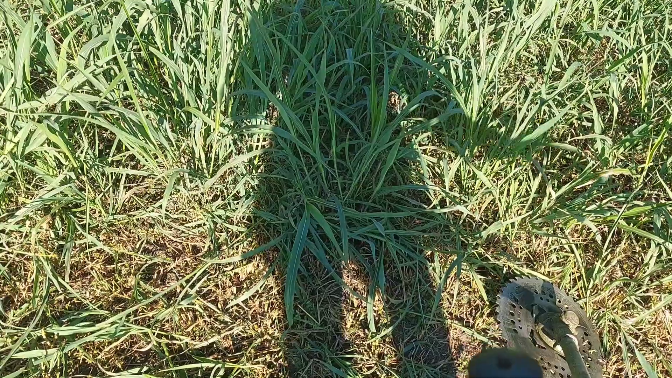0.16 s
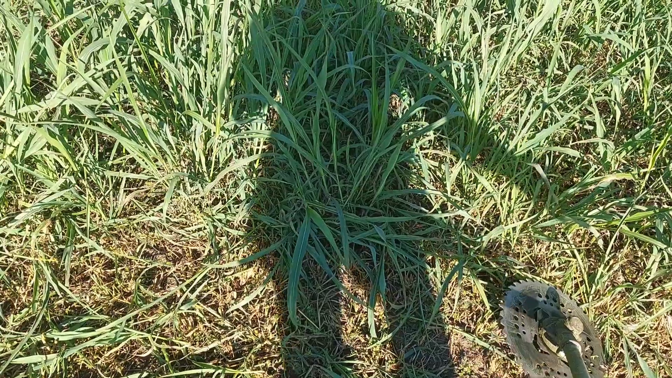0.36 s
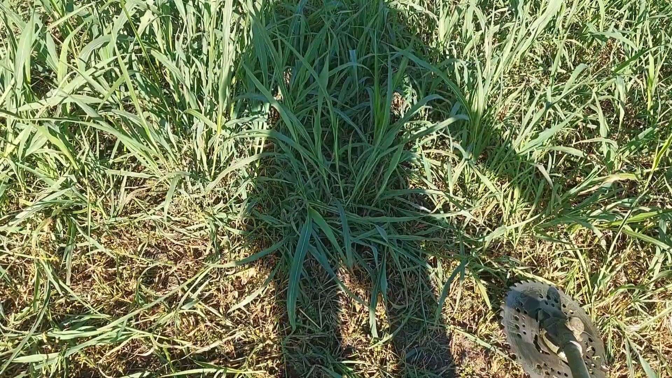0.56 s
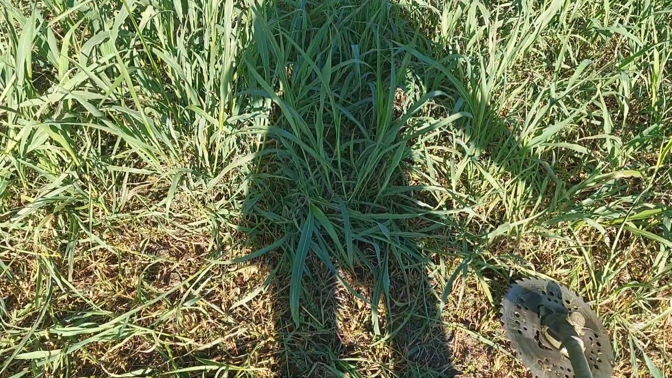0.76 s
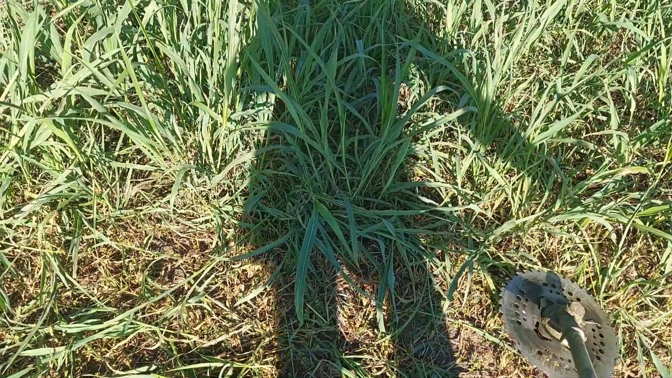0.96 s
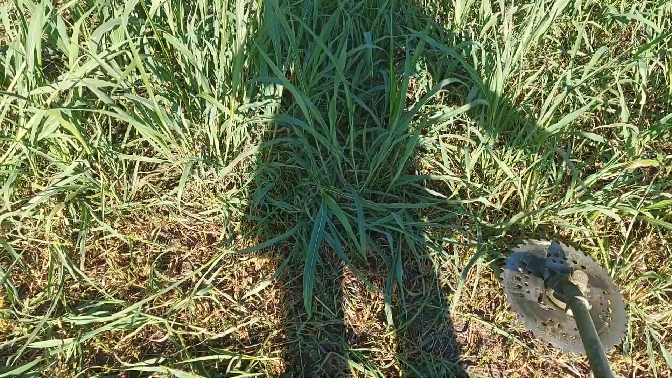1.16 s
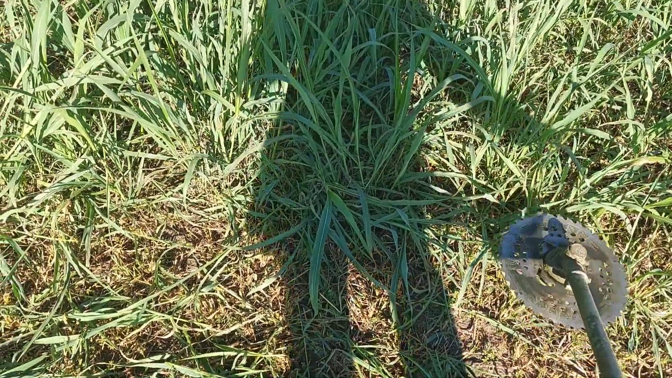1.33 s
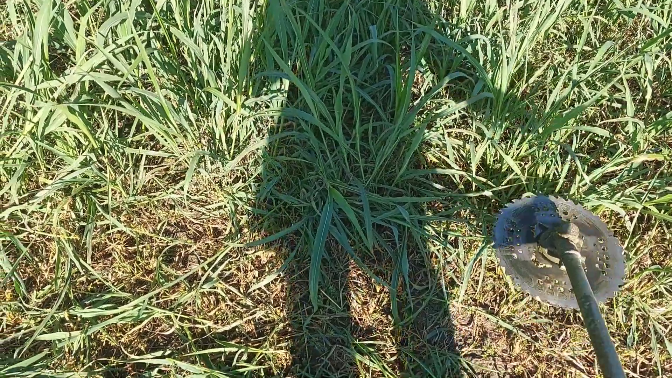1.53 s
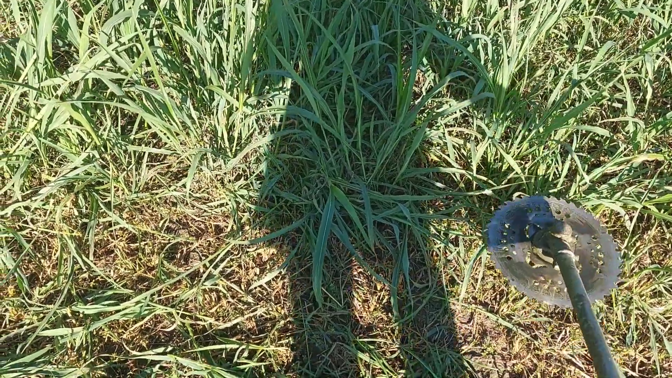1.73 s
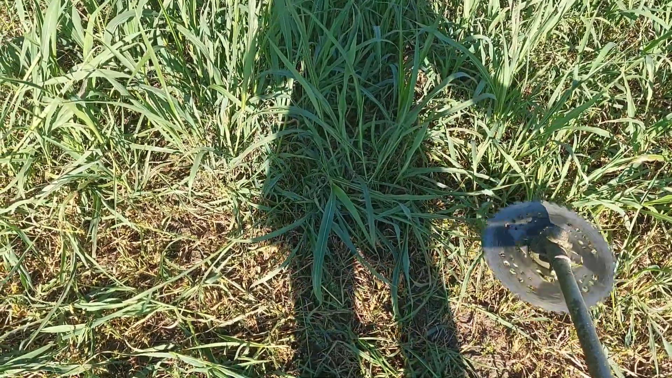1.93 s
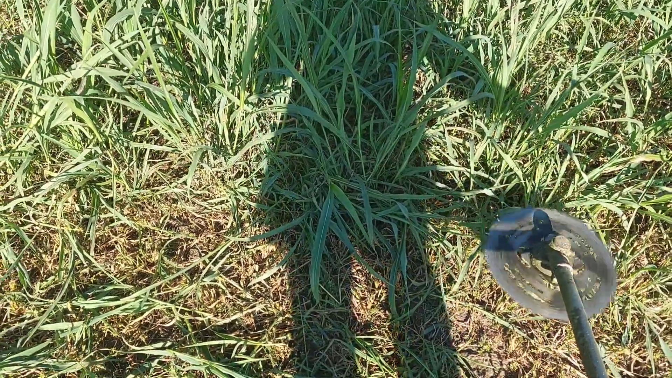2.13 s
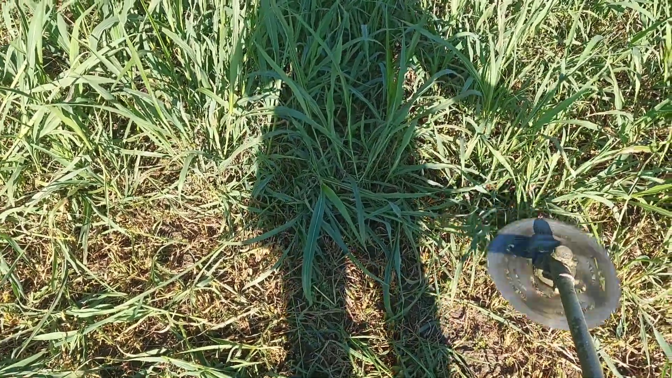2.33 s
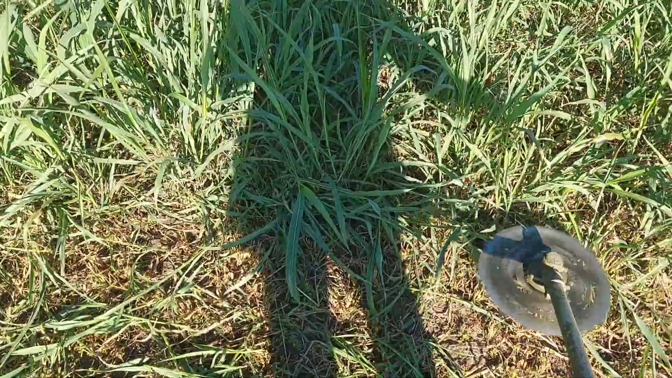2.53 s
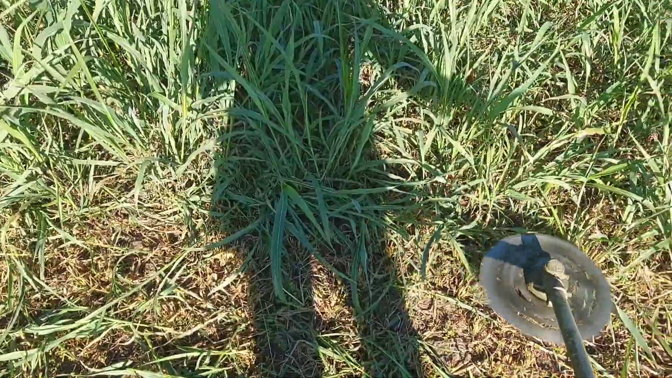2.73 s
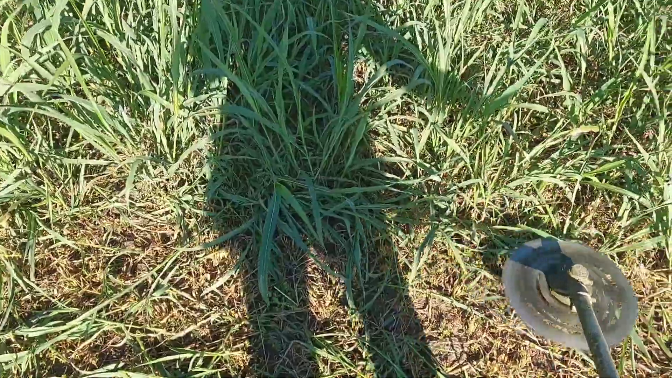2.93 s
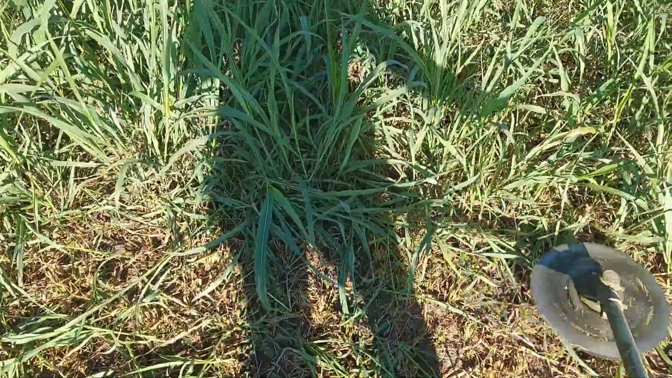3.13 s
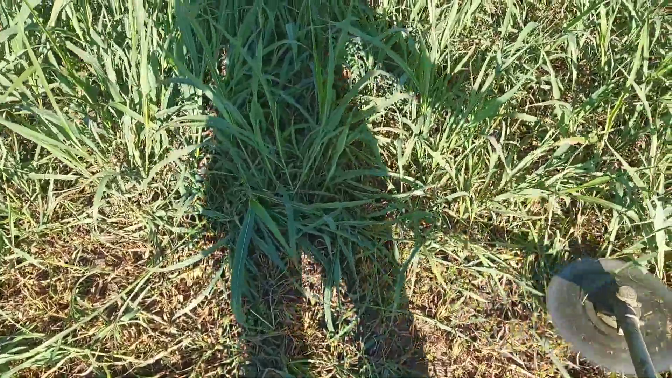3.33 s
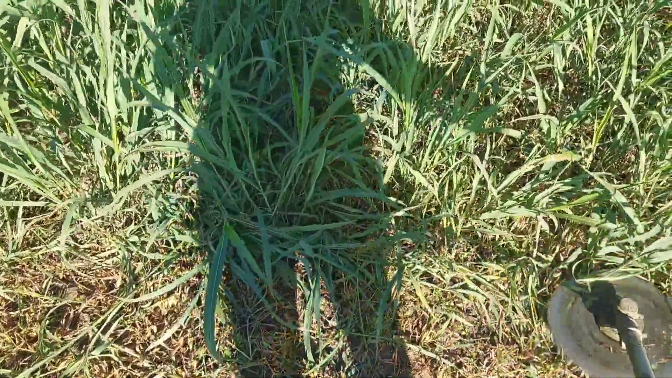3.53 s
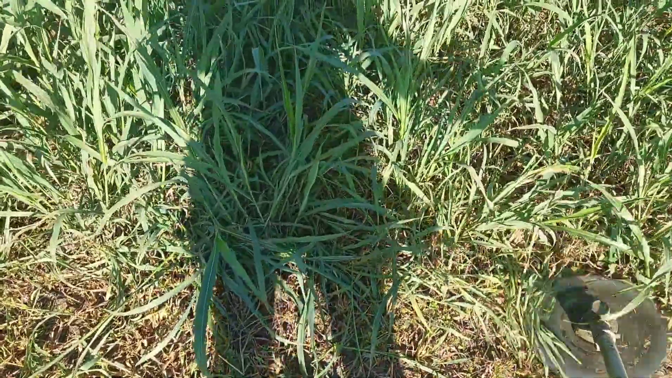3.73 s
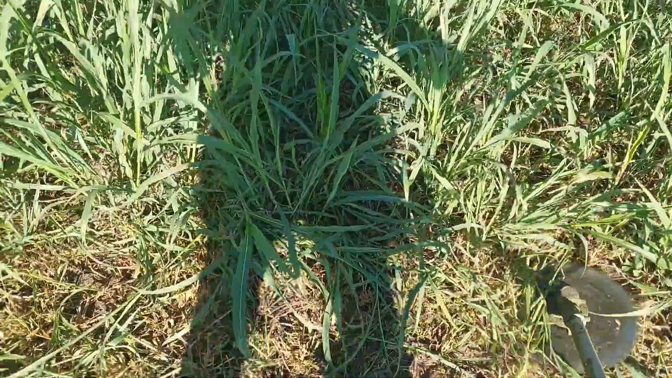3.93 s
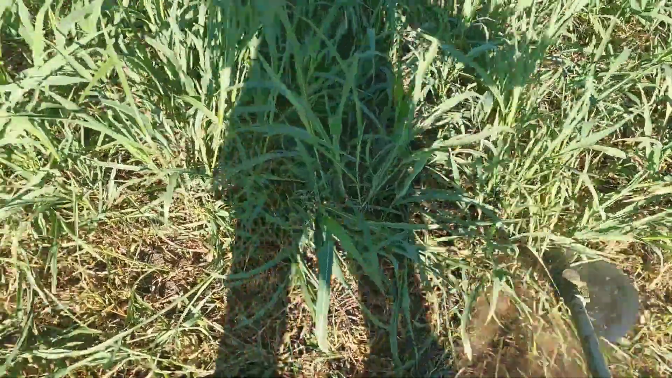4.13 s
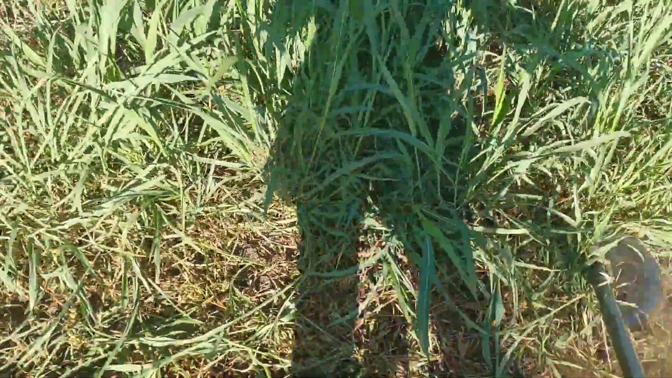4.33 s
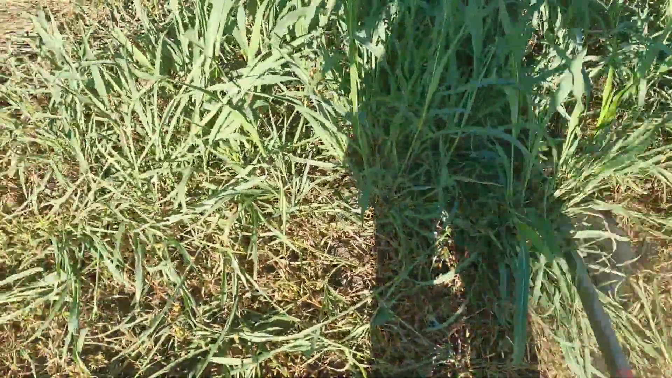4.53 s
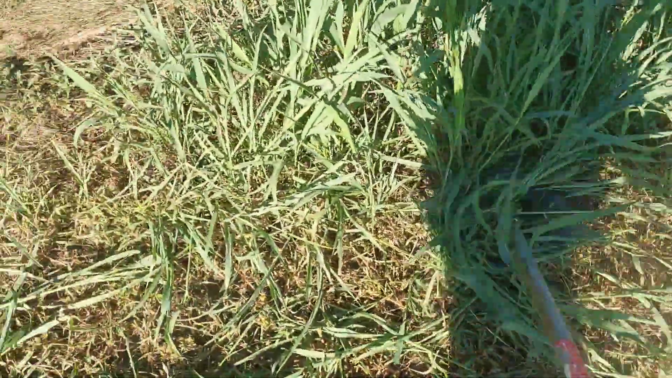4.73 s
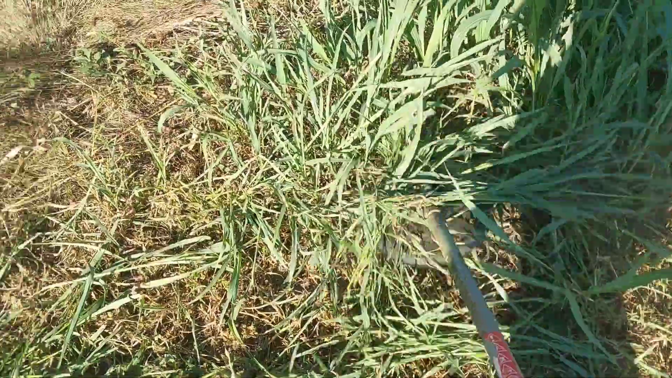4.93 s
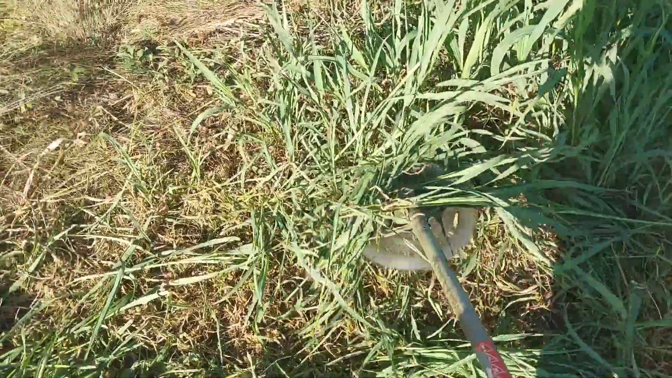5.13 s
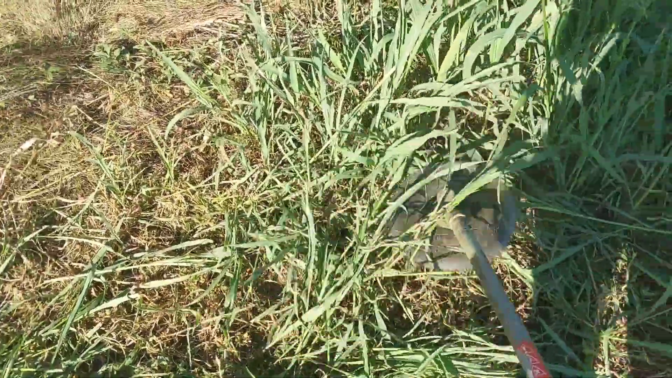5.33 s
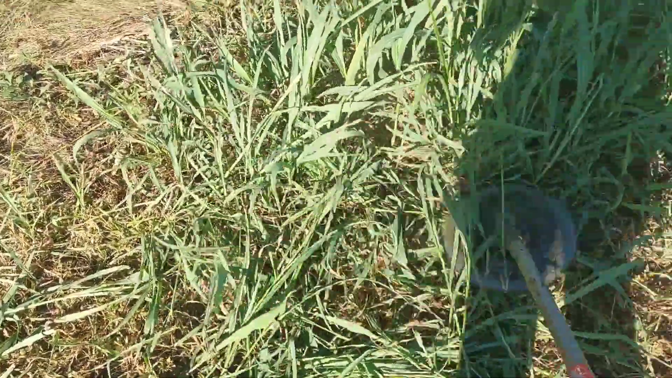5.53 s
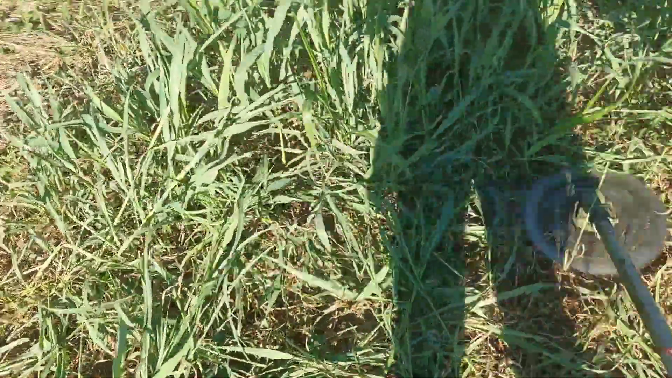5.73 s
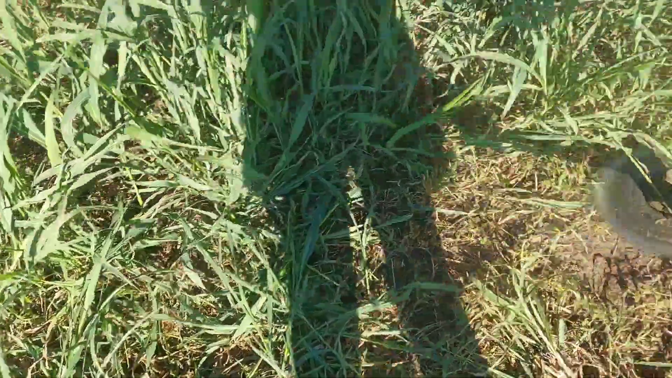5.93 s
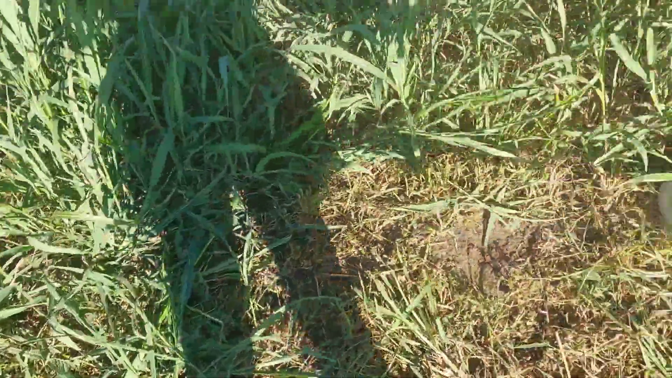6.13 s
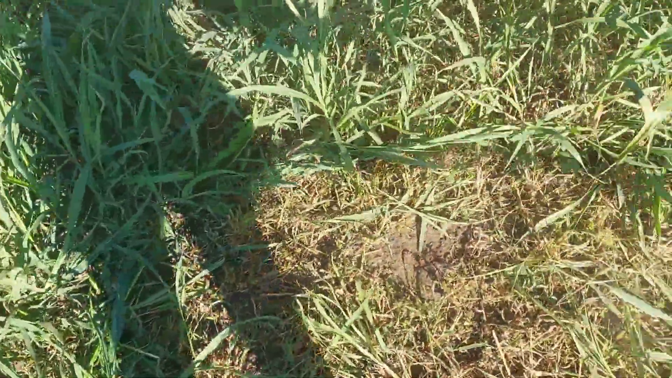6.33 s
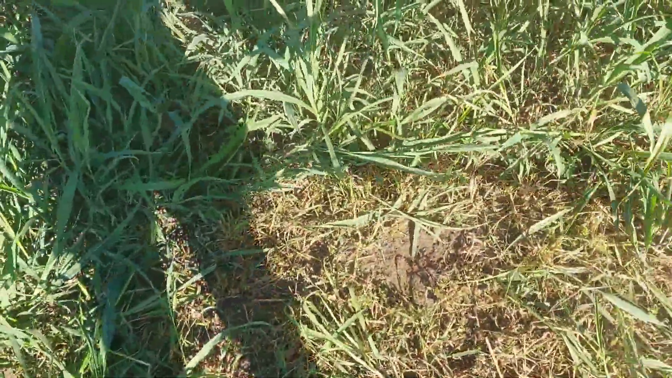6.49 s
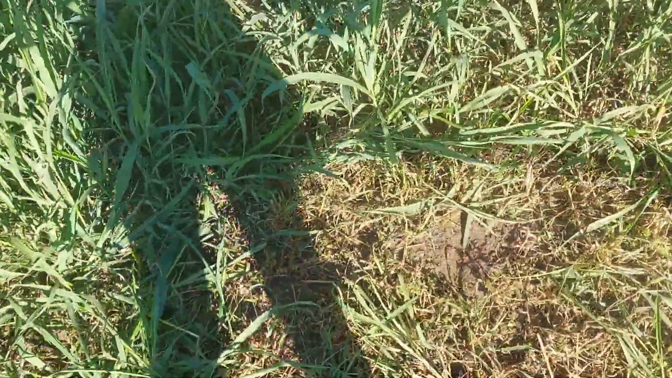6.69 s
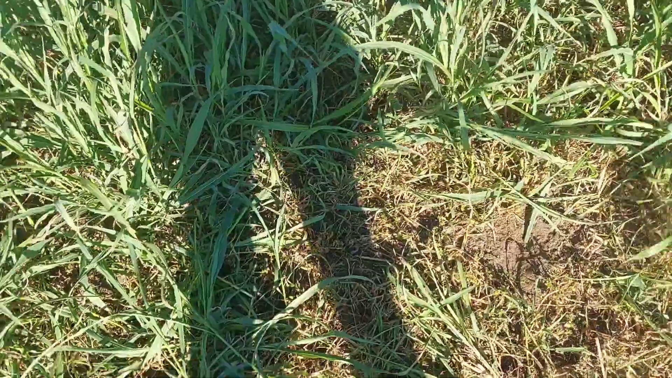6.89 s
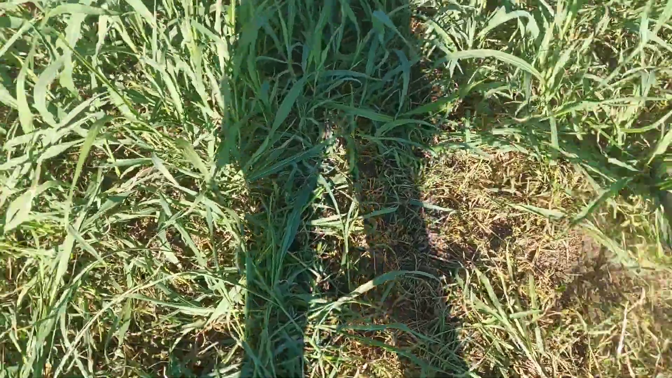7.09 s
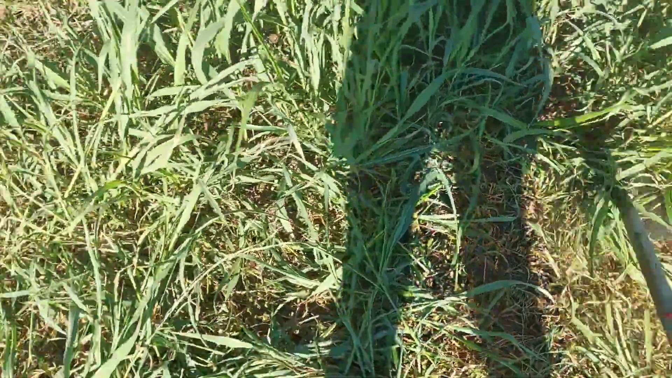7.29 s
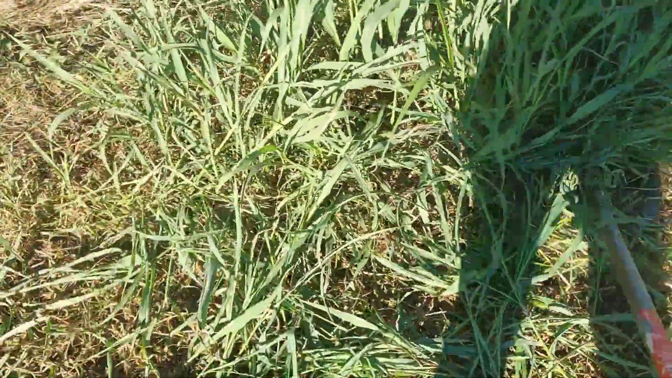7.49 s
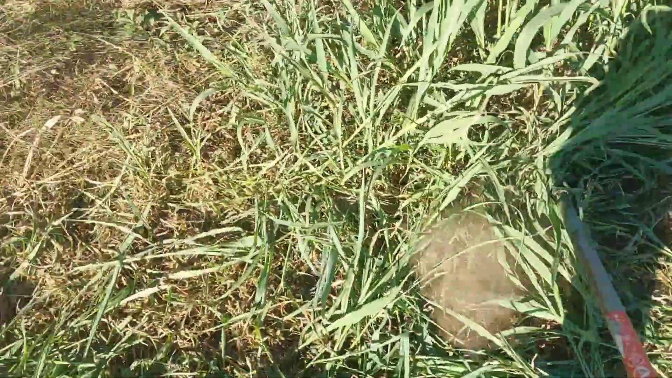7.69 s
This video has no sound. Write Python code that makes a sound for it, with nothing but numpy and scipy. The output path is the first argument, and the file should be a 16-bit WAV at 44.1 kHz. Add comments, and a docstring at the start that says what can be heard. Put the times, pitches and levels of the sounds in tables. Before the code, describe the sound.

Outdoors in tall grass, close to the microphone, leaves brush quietly and squeak on steel, and dry stems tick. Just before two seconds a trimmer drive grinds and spins up, gear whine and tooth whistle gliding upward together. From past three seconds, bright hissing bursts and sharp snaps of stalks ride on the steady whirr, with low thumps of air on the microphone.

```python
"""In tall grass, close to the microphone, a brush cutter with a toothed steel disc is lifted, spins up and mows.
Stems tick and leaves rustle as shaped noise bursts; then gear and shaft tones glide with one disc speed.
The teeth whistle and hiss through the air as tones and noise bands tied to that speed.
Stalks add short bursts of noise and tooth strikes; puffs of low-passed noise thump on the microphone."""
import sys
import numpy as np
from scipy import signal
from scipy.fft import rfft, irfft, next_fast_len
from scipy.io import wavfile
from scipy.ndimage import uniform_filter1d, map_coordinates

SR = 44100
rng = np.random.default_rng(int(sys.argv[2]) if len(sys.argv) > 2 else 0)


def store_wav(level_fs):
    """Save 16-bit WAV to argv[1]."""
    pcm = np.round(np.clip(np.atleast_2d(level_fs), -1, 1) * 32767)
    wavfile.write(sys.argv[1], SR, pcm.T.astype(np.int16))


N = 341775
T = np.arange(N) / SR  # time [s]

# All levels in the tables are relative to the gain of their own layer.
# Rotation of the disc: (time [s], speed [turns/s])
DISC_SPEED = [(1.7, 1), (2.5, 34.5), (2.8, 52), (3.1, 67.2), (3.4, 78.5), (3.7, 86.1), (4.02, 90.6),
              (4.1, 85.7), (4.5, 90.8), (5, 96), (5.4, 99.3), (6.15, 98.2), (6.45, 99.5), (6.54, 97.1),
              (6.75, 99), (7.5, 97.9), (7.62, 95.4), (7.75, 96.8)]
# Slow swells of the machine noises: (time [s], hiss level [dB], rattle level [dB], rumble level [dB])
NOISE_SWELLS = [(2.2, -2.5, -1.5, -5.5), (2.55, 3, 1.5, -2), (3.05, 1.5, 1.5, 2), (3.62, 1, 2, 1.5),
                (3.72, -1.5, 2, -1.5), (4.3, -2.5, 0, -1.5), (4.8, -1.5, 1, -2.5), (5.5, 2, 3, 0),
                (5.7, -2, 0.5, -1.5), (6.25, 0, -2.5, 0.5), (6.5, 0.5, -0.5, 1.5), (6.8, -3, -2.5, -0.5),
                (7.35, -2, -2, -.5), (7.58, 0, -3, -0.5), (7.75, -4, 0.5, -4.5)]

# Puffs on the microphone: (start [s], length [s], level [dB], cutoff [Hz])
AIR_PUFFS = [(0.145, 0.071, -61, 128), (0.518, 0.05, -57, 181), (3.666, 0.059, -32, 100),
             (4.01, 0.16, -33, 130), (4.478, 0.049, -36, 91), (6.146, 0.048, -36.5, 130),
             (6.456, 0.059, -35, 89.5), (6.7, 0.11, -31.5, 100), (6.83, 0.049, -29.5, 100),
             (7.049, 0.056, -31, 98), (7.423, 0.058, -29, 100), (7.495, 0.048, -19.5, 187),
             (7.656, 0.12, -31.5, 200)]
# Leaves brushing the cutting head: (start [s], length [s], level [dB])
LEAF_BRUSHES = [(.28, .13, -83), (0.593, .36, -79), (0.952, 0.2, -70), (1.16, 0.21, -72),
                (1.375, 0.28, -63.5), (1.575, 0.18, -67.5), (1.726, 0.2, -60.5)]
# Leaves squeaking along the steel: (start [s], length [s], centre [Hz], approximate width [Hz], level [dB])
LEAF_SQUEAKS = [(0.536, 0.046, 4200, 3000, -64), (0.676, 0.14, 3620, 1405, -64.5),
                (0.795, 0.18, 4520, 170, -67), (0.995, 0.081, 3510, 2010, -58),
                (0.98, 0.16, 3270, 352, -66), (1.805, 0.072, 4130, 400, -48)]
# Stems flicking the disc: (time [s], level [dB], left-right difference [dB])
STEM_TICKS = [(0.305, -52, 0), (0.5511, -43, 16), (1.014, -43, 2.5), (1.253, -35.5, 7), (1.6708, -30, -1),
              (1.688, -20, 4.5), (1.71, -32, 3.5), (1.8347, -23, 4), (1.8733, -23, 9), (1.9031, -8.5, 1),
              (1.9829, -17.5, 2), (2.0226, -36, 11.5)]

# Growls of the shaft tube: (start [s], length [s], centre [Hz], approximate width [Hz], level [dB])
TUBE_GROWLS = [(1.732, 0.029, 450, 498, -50), (1.715, 0.18, 1900, 4400, -48.5),
               (1.88, 0.048, 440, 350, -32), (2.09, 0.074, 500, 351, -29.5), (2.245, 0.1, 570, 552, -29)]
# Orders of the turning parts: (multiple of the disc rate [1], level [dB])
SHAFT_ORDERS = [(1, -42), (2, -57.5), (3.48, -48), (3.85, -59.5), (5, -47), (17.3, -46)]
# Housing resonances crossed by the shaft orders: (centre [Hz], width [Hz], boost [dB])
HOUSING_MODES = [(272, 97, 13.5), (1146, 210, 21)]
# Noisy overtones of the slack gears: (multiple of the disc rate [1], level [dB])
GEAR_OVERTONES = [(34.6, -8.5), (56, -12.5), (61, -9), (80.5, -18)]
# Gear-case resonances crossed by the whine: (centre [Hz], width [Hz], boost [dB])
CASE_MODES = [(765, 65, 16), (1157, 120, 13), (1866, 560, 14)]
# Flares of the whine as the drive pulls harder: (start [s], length [s], boost [dB])
WHINE_FLARES = [(3.3, 0.8, 4), (5.59, 0.35, 13), (7.476, 0.38, 10)]
# Tooth whistle by pitch: (tooth rate [Hz], level [dB])
WHISTLE_STRENGTH = [(840, -51), (1400, -32), (1780, -32.5), (2400, -33.5), (2950, -26.5), (3150, -33),
                    (3300, -43), (3620, -34), (3950, -25)]
# Gliding bands of eddies: (multiple of the disc rate [1], width [multiples of the disc rate], level [dB])
EDDY_BANDS = [(35.45, 2, -20), (40.03, 9, -18.5), (60.45, 7, -12.5), (69.2, 12, -11.5), (79.6, 8, -8),
              (97.1, 18, -3), (116, 9, -8.5)]

# Tufts bitten by the rim: (start [s], length held [s], level [dB])
GRASS_TUFTS = [(3.372, 0.2, -26), (3.644, 0.019, -22), (3.82, 0.033, -23), (4.019, 0.11, -16),
               (4.48, 0.064, -22), (4.56, 0.14, -31), (5.533, 0.11, -20), (5.64, 0.57, -23),
               (6.073, 0.13, -22), (6.475, 0.156, -28), (6.68, .09, -23), (6.838, 0.18, -22),
               (7.033, 0.34, -24.5), (7.432, 0.18, -19), (7.69, .03, -26)]
# Thick stalks being severed: (time [s], level [dB])
THICK_STALKS = [(3.899, 5), (4.3144, -1), (4.3839, -11), (4.5044, 4), (5.564, 0), (6.4742, 5.5),
                (6.7194, 0), (6.8513, -11), (7.0648, 3.5), (7.131, 3), (7.2044, 4), (7.3148, -16),
                (7.4444, 1), (7.7094, -6)]
# Harmonics of the tooth strikes: (multiple of the tooth rate [1], level [dB])
STRIKE_HARMONICS = [(1, -33), (2, 11), (3, 7.5), (4, 12)]

# Growth of noise with speed: (limiting level [dB], knee [turns/s], power exponent [1])
RUMBLE_GROWTH = (-34, 9.7, 3)
RATTLE_GROWTH = (-27.5, 47.4, 3.15)
AIR_GROWTH = (-23.5, 57.2, 4.86)

# Spectral shapes of wind, leaves, stem cracks, shaft, gears, tooth hiss and shredding:
# (frequency [Hz], level [dB])
WIND_SPECTRUM = [(15, -22), (30, -17), (50, -3.5), (80, 0.5), (140, -6), (250, -10.5), (600, -25),
                 (2000, -68)]
PUFF_SPECTRUM = [(22, -30), (40, 3), (55, -2), (400, 4.5)]
LEAF_SPECTRUM = [(88, -46), (150, -16), (213, -8), (421, -23), (713, -15), (1550, -14.5), (2790, -11.5),
                 (3260, -13), (3740, -9.5), (6700, -7), (9710, -16.5), (15800, -7.5)]
CRACK_SPECTRUM = [(300, -23), (1500, -14), (2600, 2), (3500, -6), (4700, 1), (6500, 3.5), (9000, -12),
                  (13000, -12), (16000, -10)]
RUMBLE_SPECTRUM = [(60, -54), (120, -6), (175, -11.5), (260, 1), (330, 0), (500, 2.5), (620, -5),
                   (800, -6.5), (1200, -25), (3000, -67)]
RATTLE_SPECTRUM = [(300, -27), (650, -1), (800, -2.5), (1000, -2), (1400, -1), (2200, 1.5), (3000, -4),
                   (5000, -9), (9000, -42), (16000, -60)]
HISS_SPECTRUM = [(600, -22.5), (1500, -4), (2300, -2.5), (3000, 2.5), (3700, -1.5), (4600, 3), (5600, 2),
                 (7200, 1), (8500, -6), (10000, -7.5), (13000, -2.5), (16000, -7)]
SHRED_SPECTRUM = [(800, -34), (2000, -7.5), (3200, 4), (5000, 1), (7500, 5.5), (9000, -1.5), (10500, -2),
                  (12000, 7.5), (14000, 3.5), (15700, 12.5), (17000, -40)]

GEAR_TEETH, DISC_TEETH = 20, 40
START_S, IN_GRASS_S = 1.715, 3.3  # the drive engages; the rim reaches the grass
BREEZE_DB, DRAUGHT_DB, GUST_DB = -76, -54, 1  # relative: still air, full-speed draught, its random swing
STIR_DB = -75.5  # relative level of leaves stirring all the while
SETTLE_HZ, SETTLE_DB = 61, 8  # above this speed [turns/s] the gears settle and rattle less
WHINE_DB = -40  # before resonances and flares
COAST_HZ, COAST_DB = 95, 9.5  # above this speed [turns/s] the gears carry less torque and whine less
BITE_S, CLEAR_S = 0.01, 0.043  # linear attack and exponential decay constant of a bite
STRAY_DB = -28  # relative level of stray blades between tufts
HISS_SIDE_DB, TREBLE_SIDE_DB = 4.5, -5.5  # left-right difference of the disc and of the highest cutting treble
LEFT_LAG_S = 0.00014  # the left side hears the machine later
TOP_HZ = 15880  # band limit of the recorder


def amp(db):
    """Logarithmic level: decibels become an amplitude ratio."""
    return 10 ** (np.asarray(db) / 20)


def unit(x):
    """Normalisation by effective value: the signal is scaled to rms 1."""
    return x / np.sqrt(np.mean(x ** 2) + 1e-20)


def curves(rows):
    """Linear interpolation: each column after the time gets one value per sample."""
    s, *columns = np.transpose(rows)
    return [np.interp(T, s, column) for column in columns]


def onset(s):
    """Linear gating: the gain opens over 50 ms from time s."""
    return np.clip((T - s) * 20, 0, 1)


def swell(s, length):
    """Raised-cosine window: a smooth bump starts at s."""
    return np.sin(np.pi * np.clip((T - s) / length, 0, 1)) ** 2


def pan(db):
    """Interaural level difference: half is given to the left and half taken from the right."""
    side = np.atleast_1d(db)
    return amp(np.array([side, -side]) / 2)


def wobble(rate):
    """Slow random modulation: a spline joins Gaussian knots, rate of them a second."""
    knots = rng.standard_normal(int(N * rate / SR) + 4)
    return map_coordinates(knots, [T * rate])


def filtered(x, gain):
    """Linear filtering: the spectrum is multiplied by a frequency-dependent gain."""
    size = next_fast_len(x.shape[-1] + 8192)
    hz = np.fft.rfftfreq(size, 1 / SR)
    return irfft(rfft(x, size) * gain(hz), size)[..., :x.shape[-1]]


def coloured(x, points):
    """Spectral shaping: levels are interpolated on a logarithmic frequency axis, at rms 1."""
    f, db = np.transpose(points)
    return unit(filtered(x, lambda hz: amp(np.interp(np.log(hz + 1), np.log(f), db))))


def noise(points, alike=0):
    """Partial coherence: both sides of a stereo noise have the power share alike in common."""
    common = np.sqrt(alike) * rng.standard_normal(N)
    separate = np.sqrt(1 - alike) * rng.standard_normal((2, N))
    return coloured(common + separate, points)


def tone(cycles, rough, flutter):
    """Line broadening: the rough power share of a tone flutters at random in level and phase."""
    angle = 2 * np.pi * cycles
    steady = np.sqrt(2 * (1 - rough)) * np.cos(angle)
    fluttering = wobble(flutter) * np.cos(angle) + wobble(flutter) * np.sin(angle)
    return steady + np.sqrt(rough) * fluttering


def band(cycles, spread):
    """Narrow-band noise: random quadratures on a gliding line lose coherence with each step of spread."""
    knots = rng.standard_normal((2, 2, int(spread[-1]) + 4))
    steps = np.arange(knots.shape[-1])
    cos, sin = np.cos(2 * np.pi * cycles), np.sin(2 * np.pi * cycles)
    sides = [np.interp(spread, steps, a) * cos + np.interp(spread, steps, b) * sin for a, b in knots]
    return unit(np.array(sides))


def patchy(x, depth_db):
    """Time-varying filtering: the colour shifts in patches as the head moves over the ground."""
    z = signal.stft(x, nperseg=512)[2]
    field = rng.standard_normal(z.shape[1:])
    field = uniform_filter1d(field, size=5, axis=0)  # across frequency
    field = uniform_filter1d(field, size=16, axis=1)  # across time
    gain = unit(amp(depth_db * unit(field)))
    return signal.istft(z * gain, nperseg=512)[1][:, :N]


def resonance_db(hz, modes):
    """Resonance: a moving tone is lifted as it crosses each mode."""
    return sum(db / (1 + ((hz - centre) / (width / 2)) ** 2) for centre, width, db in modes)


def plate_db(hz):
    """Plate resonance: the steel rings near 3 kHz and lifts whatever glides through."""
    return resonance_db(hz, [(3000, 600, 8)])


def growth(disc_hz, law):
    """Power-law emission: noise grows with speed and levels off above a knee."""
    full_db, knee_hz, steepness = law
    return full_db - 10 * np.log10(1 + (knee_hz / disc_hz) ** steepness)


def wind(disc_hz):
    """Pressure fluctuation: breeze, the disc's draught and sudden puffs press on the microphone."""
    draught = amp(DRAUGHT_DB + GUST_DB * wobble(5)) * (disc_hz / disc_hz.max()) ** 1.5
    out = (amp(BREEZE_DB) + draught) * amp(7.5) * noise(WIND_SPECTRUM, alike=0.28)
    air = noise(PUFF_SPECTRUM, alike=0.39)
    for s, length, db, cutoff_hz in AIR_PUFFS:
        lowpass = signal.butter(3, cutoff_hz, fs=SR, output="sos")
        out = out + amp(db) * swell(s, length) * unit(signal.sosfilt(lowpass, air))
    return out * pan(5.5)


def grass():
    """Friction: leaves stir, brush and squeak along the cutting head."""
    rustle = amp(STIR_DB) + sum(amp(db) * swell(s, length) for s, length, db in LEAF_BRUSHES)
    squeaks = sum(amp(db) * swell(s, length) * band(hz * T, width_hz * T)
                  for s, length, hz, width_hz, db in LEAF_SQUEAKS)
    return rustle * amp(5.5) * noise(LEAF_SPECTRUM, alike=0.12) * pan(5.3) + squeaks * pan(4.0)


def stems():
    """Impact: dry stems flick the disc with a sharp crack and a short rustling tail."""
    out = np.zeros((2, N))
    age = np.arange(SR // 10) / SR
    crack_decay = amp(-60 * age / 0.012)
    tail_decay = amp(-31) * amp(-60 * age / 0.15)
    shape = (crack_decay + tail_decay) * (1 - np.exp(-age / 0.00048))
    for s, db, side_db in STEM_TICKS:
        crack = coloured(rng.standard_normal((2, len(age))), CRACK_SPECTRUM)
        out[:, round(s * SR):][:, :len(age)] += amp(db - 4.0) * crack * shape * pan(side_db)
    return out


def shudder():
    """Structural vibration: the drive grinds and its tube growls in short noise bands."""
    growls = sum(amp(db) * swell(s, length) * band(hz * T, width_hz * T)[0]
                 for s, length, hz, width_hz, db in TUBE_GROWLS)
    return filtered(growls, lambda hz: 1 - 1 / (1 + (hz / 200) ** 6))  # the thin tube radiates no bass


def shaft(disc_hz, turns):
    """Unbalance: rotor orders grow with speed and flare as they cross the housing's resonances."""
    hum = np.zeros(N)
    for multiple, db in SHAFT_ORDERS:
        boost_db = resonance_db(multiple * disc_hz, HOUSING_MODES)
        radiated = 1 / (1 + (75 / (multiple * disc_hz)) ** 4)  # a small body radiates little bass
        hum += amp(db + boost_db) * radiated * tone(multiple * turns, rough=0.084, flutter=25)
    return hum * (disc_hz / disc_hz.max()) ** 1.36 * pan(0.37)


def clatter(disc_hz, turns, rumble_db, rattle_db):
    """Amplitude modulation: shaft rumble in the tube and gear rattle both pulse once a turn."""
    beat = 1 + 0.12 * np.cos(2 * np.pi * turns)
    rumble = amp(rumble_db - 0.5) * noise(RUMBLE_SPECTRUM, alike=0.81) * pan(0.99)
    slack = 1 / (1 + (disc_hz / 58) ** 10)  # the gears settle at speed
    overtones = sum(amp(db + 1.3 * plate_db(multiple * disc_hz)) * band(multiple * turns, 3 * turns)
                    for multiple, db in GEAR_OVERTONES)
    broad = amp(5.0 - 3.2 * slack) * noise(RATTLE_SPECTRUM, alike=0.43)
    rattle = amp(rattle_db) * (broad + amp(1.5) * slack * overtones)
    return beat * (rumble + rattle * pan(0.47))


def whine_level(disc_hz):
    """Resonant gain: the mesh tone swells in the case modes, flares, and drops near top speed."""
    lift_db = resonance_db(GEAR_TEETH * disc_hz, CASE_MODES)
    coasting = np.clip(disc_hz - COAST_HZ, 0, 1)
    flare_db = sum(db * swell(s, length) for s, length, db in WHINE_FLARES)
    return WHINE_DB + lift_db - COAST_DB * coasting + flare_db


def gearbox(disc_hz, turns, whine_db):
    """Gear mesh: the tooth rate whines; an off-centre wheel adds sidebands, stronger with speed."""
    angle = 2 * np.pi * GEAR_TEETH * turns + 0.3 * wobble(60)
    flutter_db, drift_db = 2 * wobble(30), 4 * wobble(5)
    sway = amp(-40.5 + drift_db) * (disc_hz / disc_hz.max()) ** 3 * np.cos(2 * np.pi * turns)
    return (amp(whine_db + flutter_db) + 2 * sway) * np.cos(angle) * pan(4.5)


def disc(disc_hz, turns, whistle_db, air_db):
    """Aeroacoustic emission: teeth chop air into a whistle, gliding bands of eddies and a broad hiss."""
    free = 1 - 0.55 * onset(IN_GRASS_S)  # the whistle is clear in free air and frays in the grass
    tooth_cycles = DISC_TEETH * turns
    core = np.array([tone(tooth_cycles, rough=0.35, flutter=45) for side in range(2)])
    frayed = band(tooth_cycles, 4 * turns)
    whistle = amp(whistle_db - 3.0) * (amp(3.0) * free ** 0.34 * core + np.sqrt(1 - free) * frayed)
    eddies = sum(amp(db + plate_db(multiple * disc_hz) + 0.63 * wobble(12)) * band(multiple * turns, width * turns)
                 for multiple, width, db in EDDY_BANDS)
    # the plate radiates less above 8 kHz
    eddies = filtered(eddies, lambda hz: 0.43 + 0.41 / (1 + (hz / 7900) ** 20))
    hiss = patchy(amp(1.0) * noise(HISS_SPECTRUM, alike=0.23) + amp(0.1) * eddies, depth_db=1.88)
    return (whistle + amp(air_db + 0.71 * wobble(30)) * hiss) * pan(HISS_SIDE_DB)


def bites():
    """Energy summation: tufts come in fast, hold and clear, adding in power to stray blades."""
    power = amp(STRAY_DB) ** 2
    for s, length, db in GRASS_TUFTS:
        attack = np.clip((T - s) / BITE_S, 0, 1)
        release = np.exp(-np.maximum(T - s - length, 0) / CLEAR_S)
        power = power + (amp(db) * attack * release) ** 2
    return np.sqrt(power) * amp(1.36 * wobble(25))


def cutting_force():
    """Shot process: random stalks and listed thick ones each add a burst lasting a few ms."""
    age = np.arange(SR // 20) / SR
    burst = np.exp(-age / 0.0035) * (1 - np.exp(-age / 0.0032))
    stalk_db = np.minimum(5 * rng.exponential(size=N), 13)
    arrivals = (rng.random(N) < 170 / SR) * amp(stalk_db)  # about 170 a second
    power = signal.fftconvolve(arrivals ** 2, burst ** 2)[:N]
    load = unit(np.sqrt(np.abs(power + 0.5)))
    force = amp(-3.2) * bites() * load * onset(IN_GRASS_S)
    for s, db in THICK_STALKS:
        since = np.maximum(T - s, 0)
        force = force + amp(db - 21.5) * np.exp(-since / 0.0073) * (1 - np.exp(-since / 0.001))
    return force


def mowing(turns):
    """Fracture: the cutting force drives shredding noise, fibre snaps and uneven tooth strikes."""
    force = cutting_force()
    scatter = np.array([wobble(700), wobble(700)])  # teeth bite early or late
    drift = 0.18 * np.array([wobble(150), wobble(150)])
    strike_cycles = DISC_TEETH * turns + drift + 0.1 * scatter
    strikes = unit(sum(amp(db) * np.cos(2 * np.pi * k * strike_cycles) for k, db in STRIKE_HARMONICS))
    snaps = (rng.random(N) < 2500 / SR) * rng.standard_normal((2, N))  # single fibres break
    shreds = patchy(noise(SHRED_SPECTRUM), depth_db=4.5) + amp(-6.0) * coloured(snaps, SHRED_SPECTRUM)
    cut = force * (shreds + amp(-3.0) * strikes)
    top = filtered(cut, lambda hz: 1 - 1 / (1 + (hz / 10500) ** 8))  # the highest treble beams its own way
    return (cut - top) * pan(HISS_SIDE_DB) + top * pan(TREBLE_SIDE_DB)


def delay_left(x):
    """Interaural time difference: a linear phase delays the left side."""
    lag = LEFT_LAG_S * np.array([[1], [0]])
    return filtered(x, lambda hz: np.exp(-2j * np.pi * hz * lag))


def scene():
    """Superposition: one turning speed plays every part of the machine, and all sources add."""
    disc_hz, = curves(DISC_SPEED)
    hiss_swell_db, rattle_swell_db, rumble_swell_db = curves(NOISE_SWELLS)
    turns = np.cumsum(disc_hz) / SR
    settled = 1 - 1 / (1 + (disc_hz / SETTLE_HZ) ** 20)
    rumble_db = growth(disc_hz, RUMBLE_GROWTH) + rumble_swell_db + 0.63 * wobble(9)
    rattle_db = growth(disc_hz, RATTLE_GROWTH) - SETTLE_DB * settled + rattle_swell_db
    air_db = growth(disc_hz, AIR_GROWTH) + hiss_swell_db
    whistle_db = np.interp(DISC_TEETH * disc_hz, *np.transpose(WHISTLE_STRENGTH)) + 3.04 * wobble(10)
    slow_db = 20 * np.log10(np.minimum(disc_hz / 21, 1) ** 2)  # tones fade in with the square of speed

    background = (grass() + wind(disc_hz)) * onset(0.12)
    machine = shaft(disc_hz, turns) + clatter(disc_hz, turns, rumble_db, rattle_db)
    machine = machine + gearbox(disc_hz, turns, whine_level(disc_hz) + slow_db)
    machine = machine + disc(disc_hz, turns, whistle_db + slow_db, air_db)
    machine = delay_left(machine * onset(START_S) + shudder())
    return background + stems() + machine + mowing(turns)


def record(dry):
    """Saturation and band limiting: the recorder rounds the highest peaks and removes the top treble."""
    rounded = dry / (1 + np.abs(dry / 0.75) ** 6) ** (1 / 6)
    return filtered(rounded, lambda hz: 1 / (1 + (hz / TOP_HZ) ** 400))


dry = scene()
out = record(dry)
store_wav(out)
```